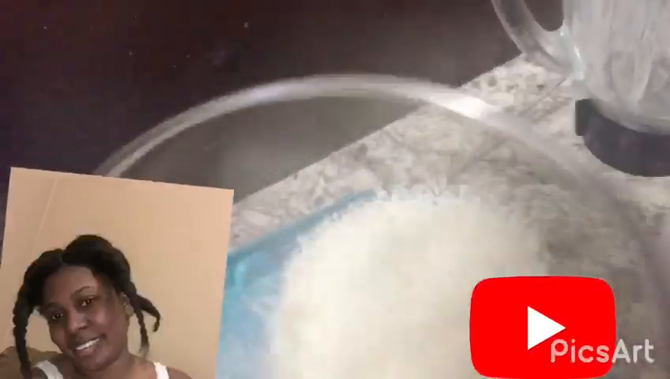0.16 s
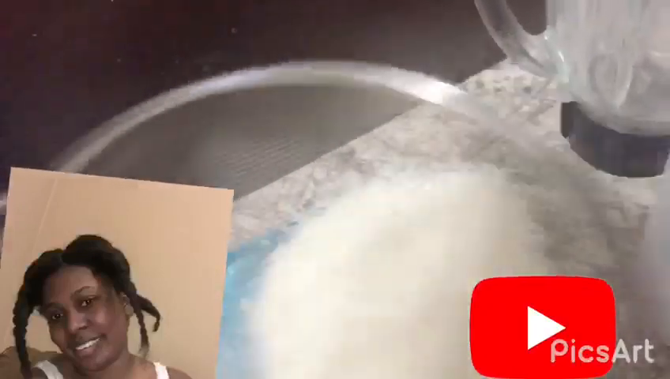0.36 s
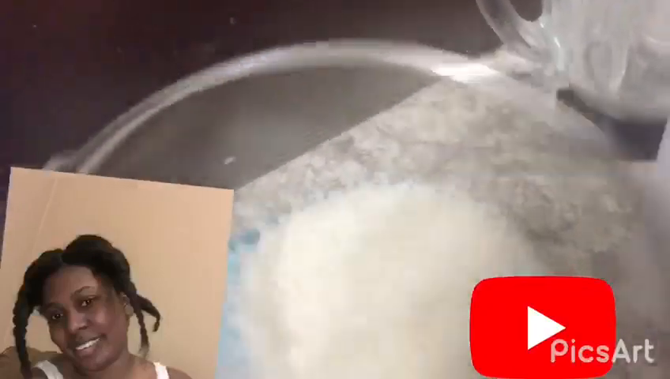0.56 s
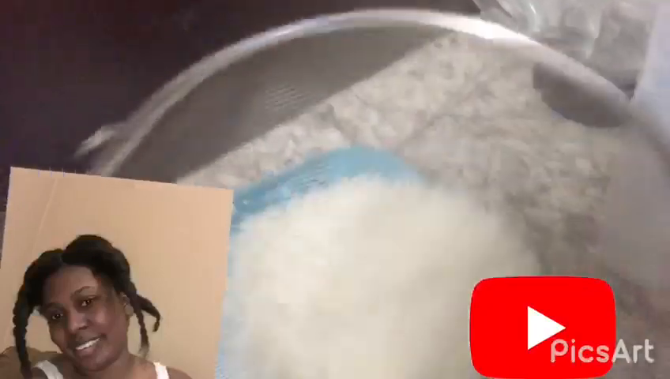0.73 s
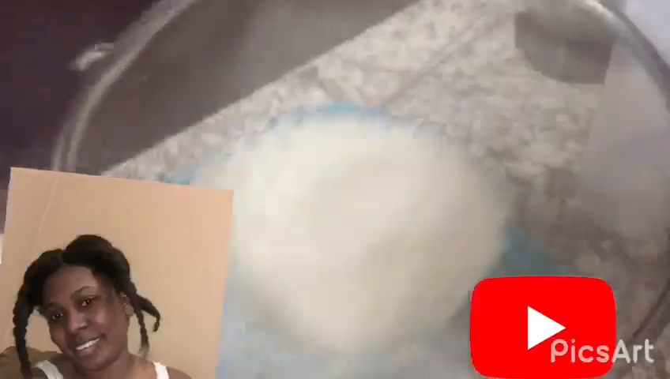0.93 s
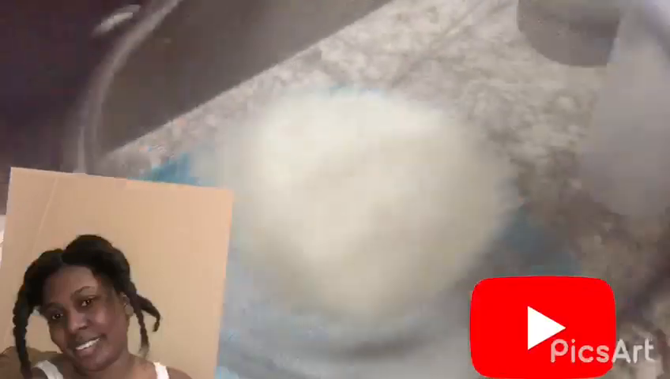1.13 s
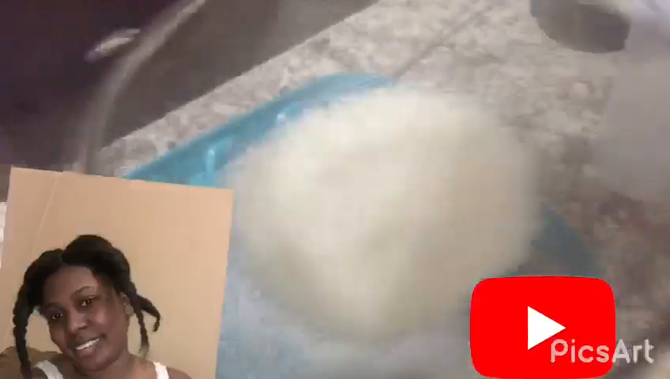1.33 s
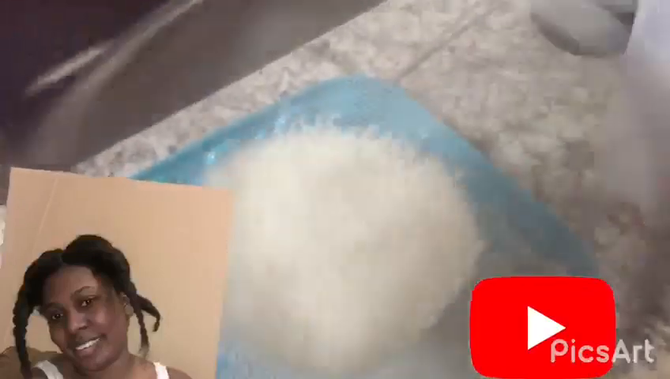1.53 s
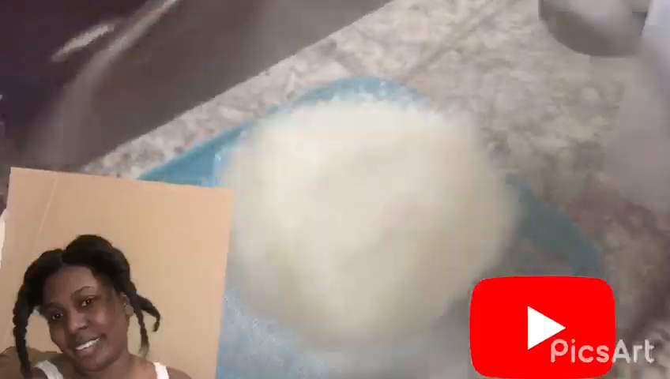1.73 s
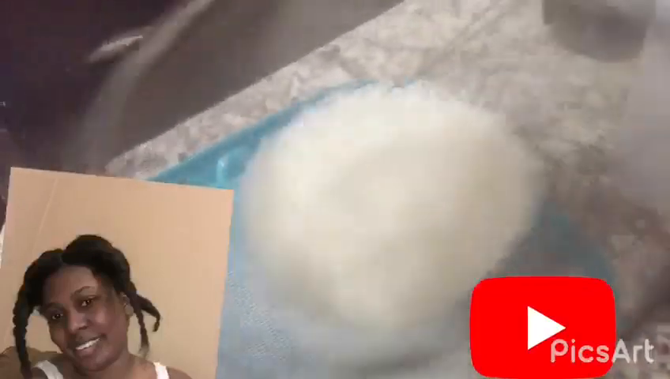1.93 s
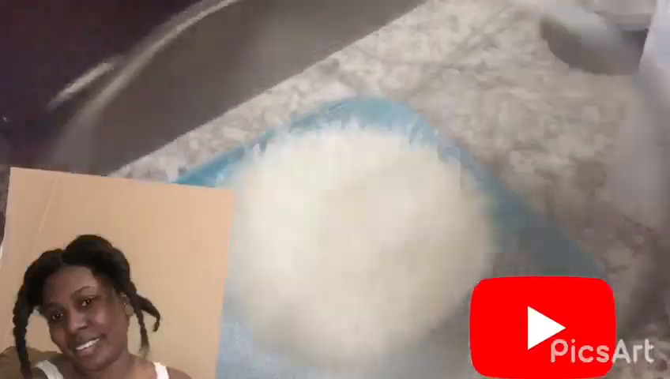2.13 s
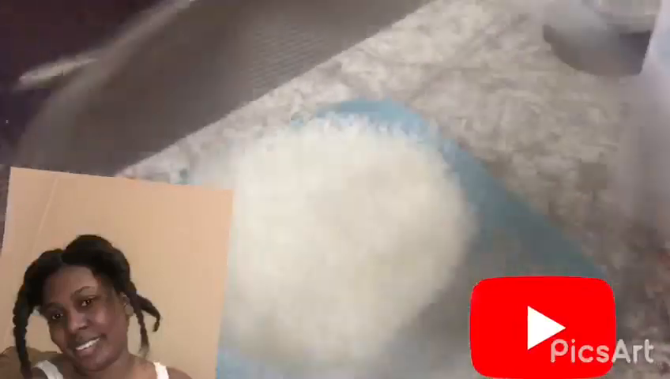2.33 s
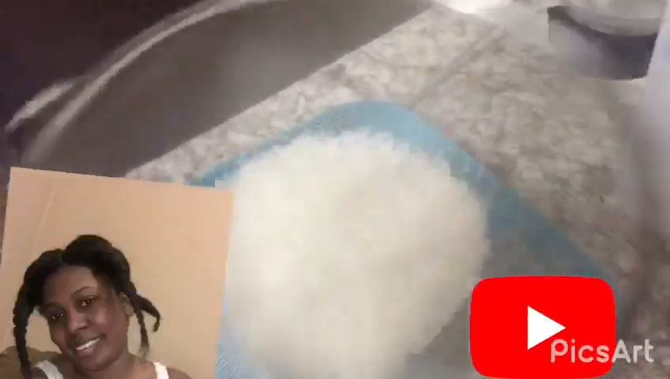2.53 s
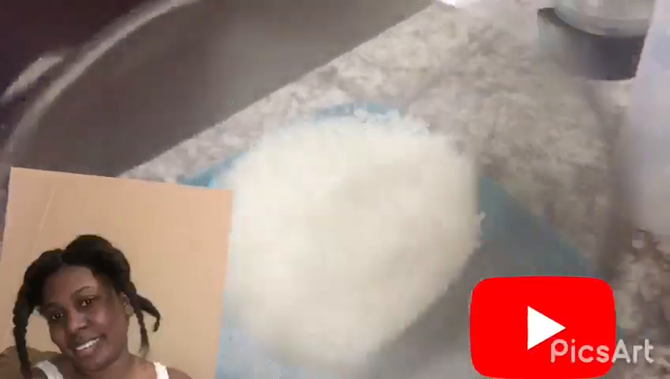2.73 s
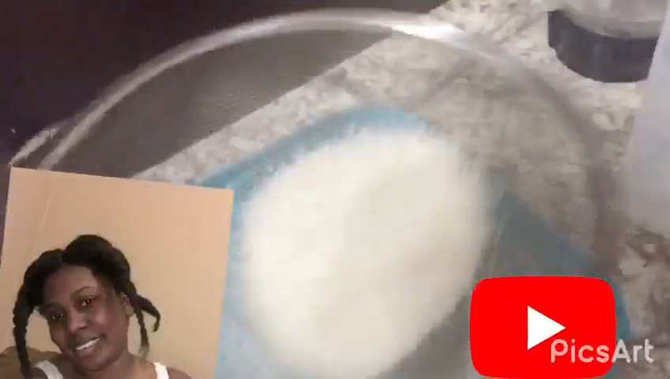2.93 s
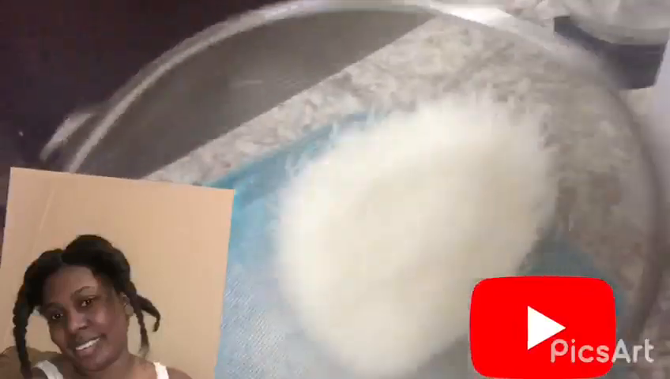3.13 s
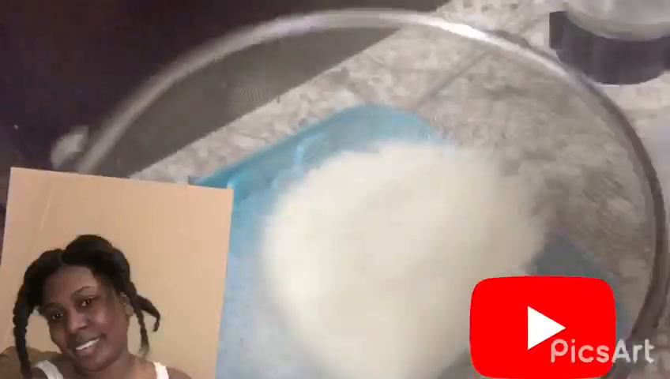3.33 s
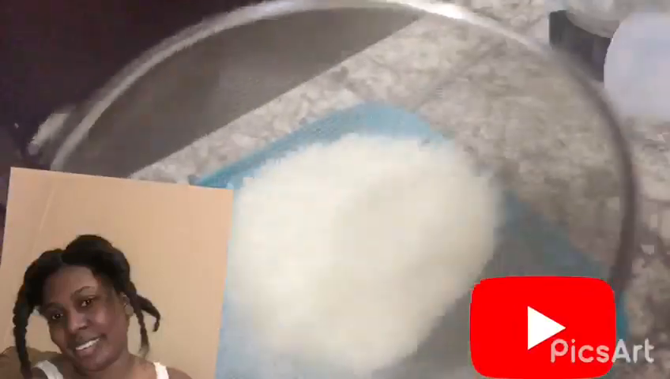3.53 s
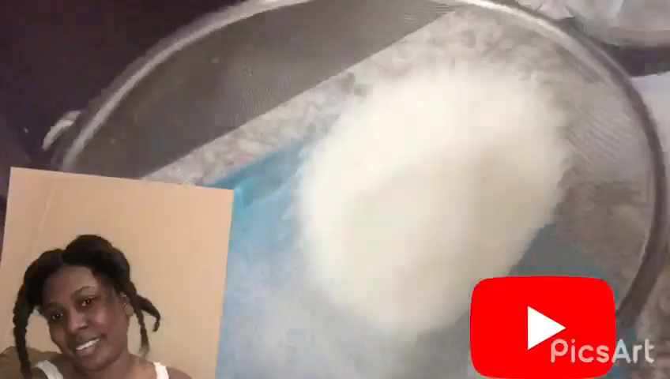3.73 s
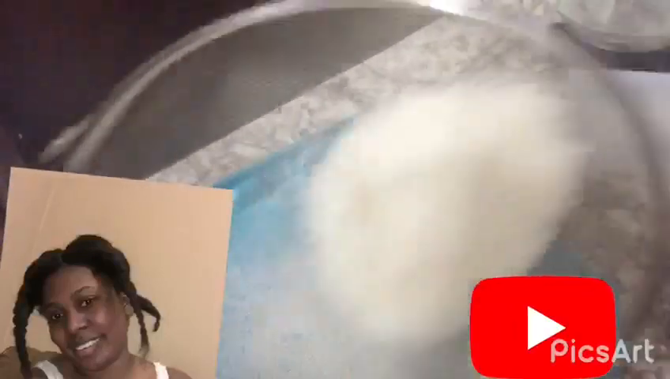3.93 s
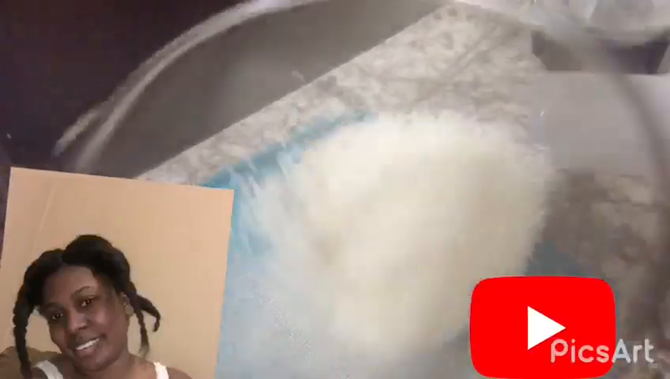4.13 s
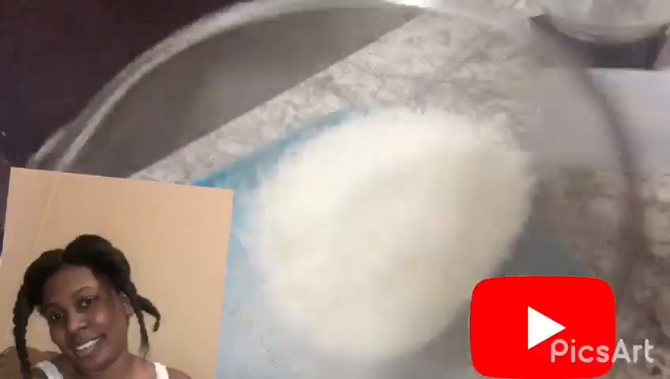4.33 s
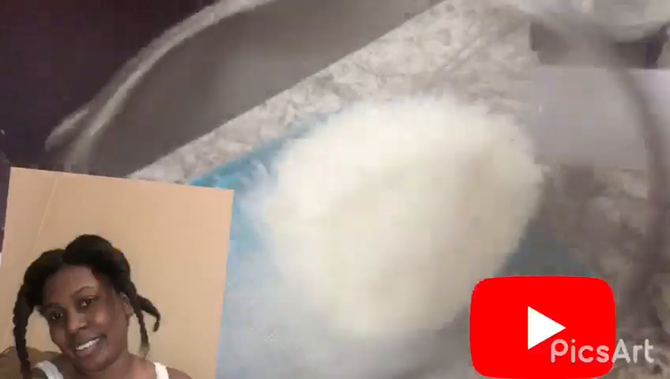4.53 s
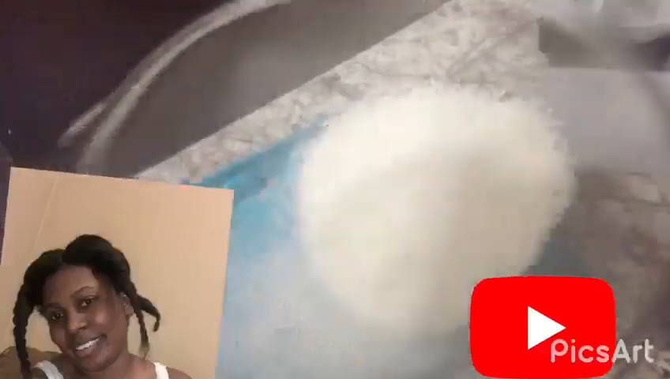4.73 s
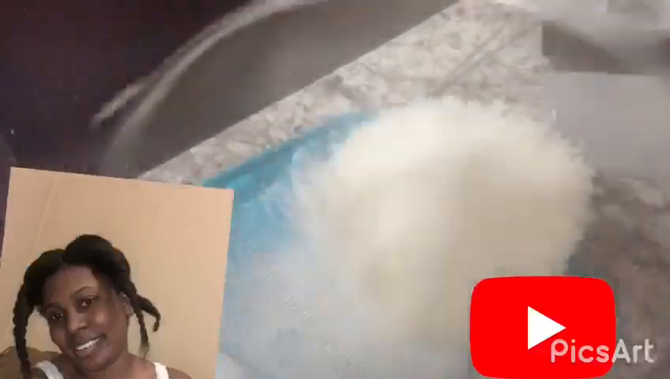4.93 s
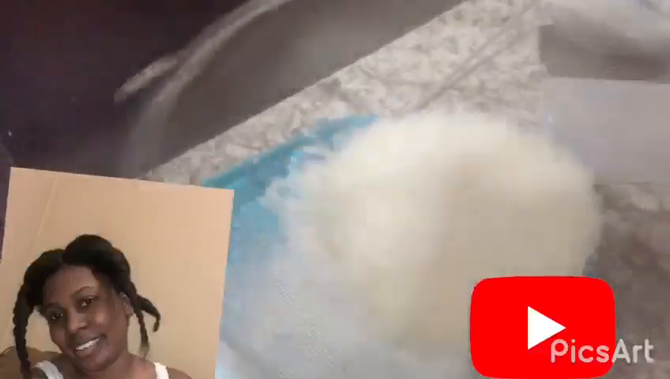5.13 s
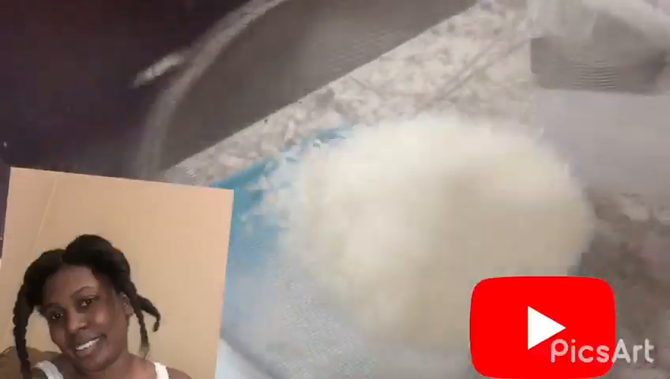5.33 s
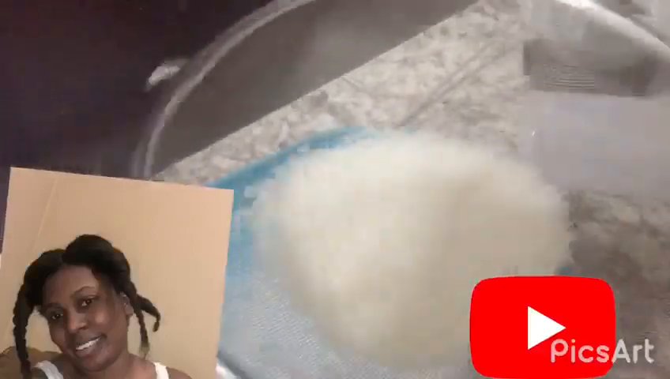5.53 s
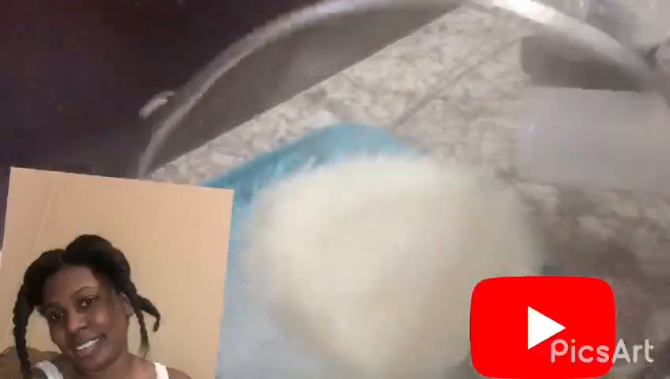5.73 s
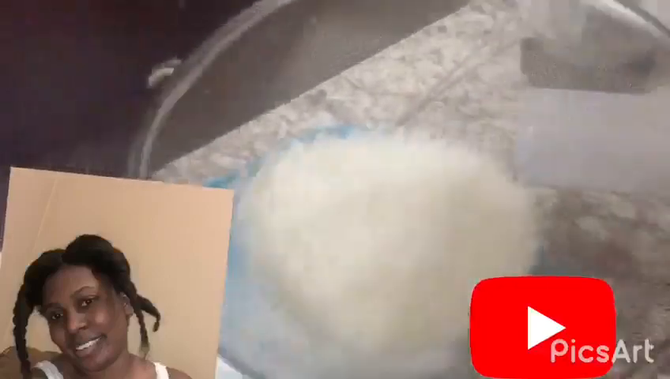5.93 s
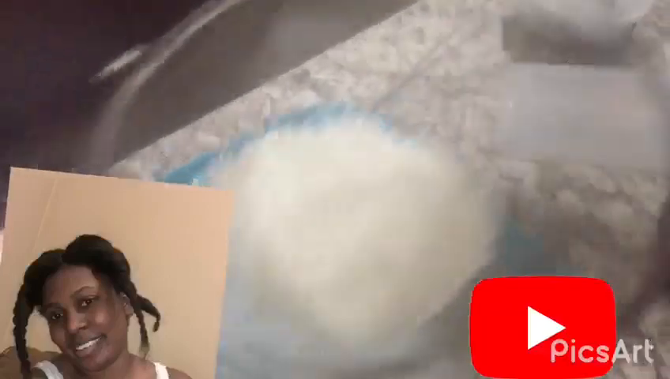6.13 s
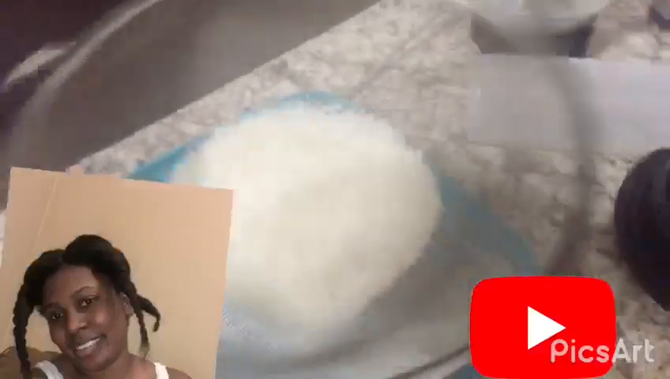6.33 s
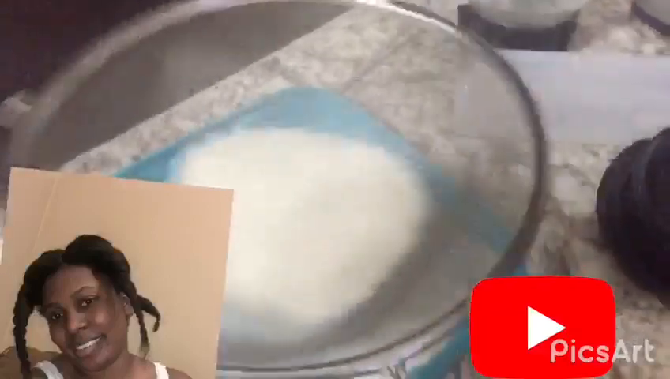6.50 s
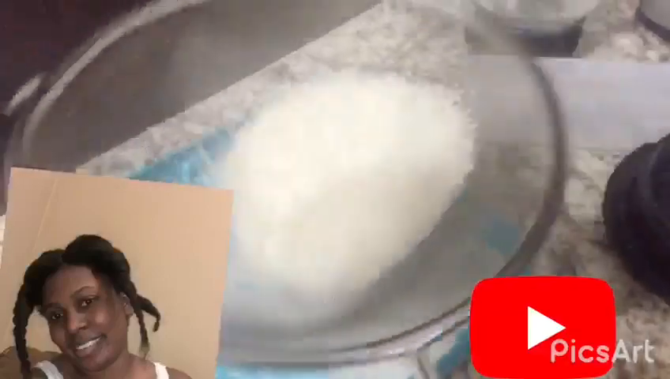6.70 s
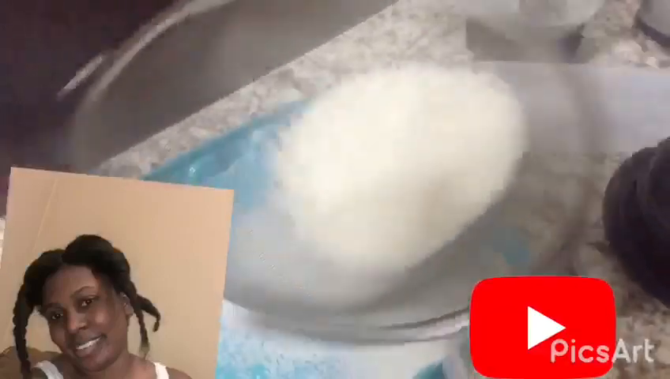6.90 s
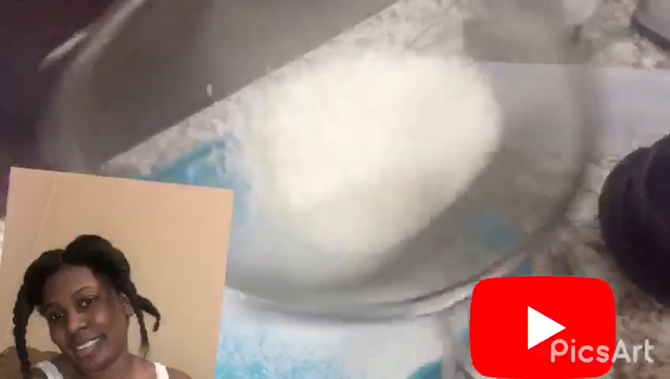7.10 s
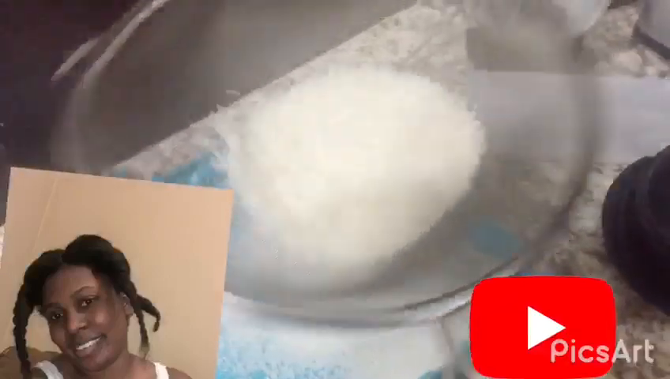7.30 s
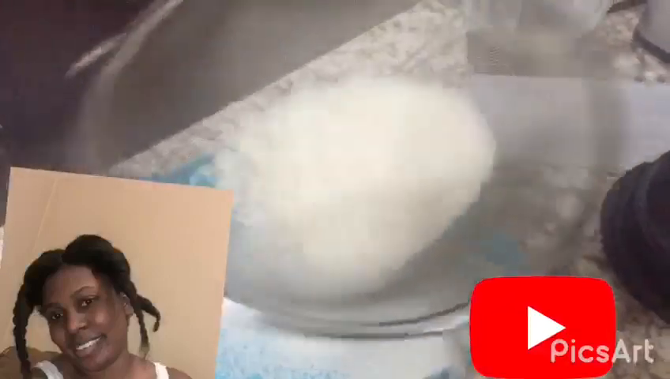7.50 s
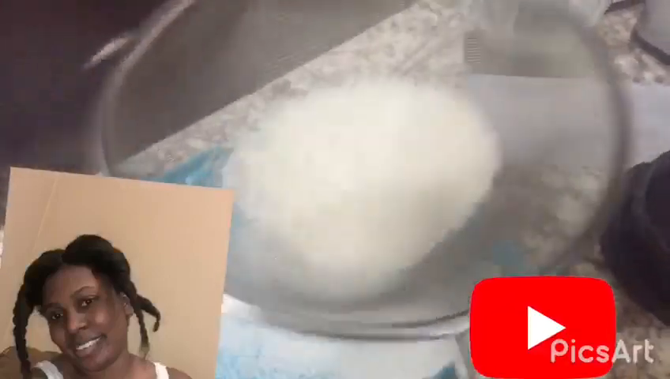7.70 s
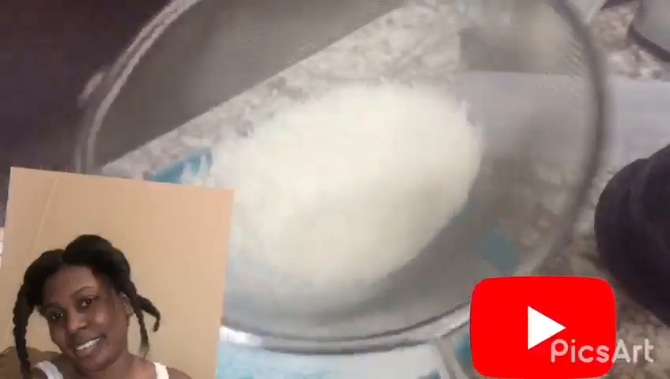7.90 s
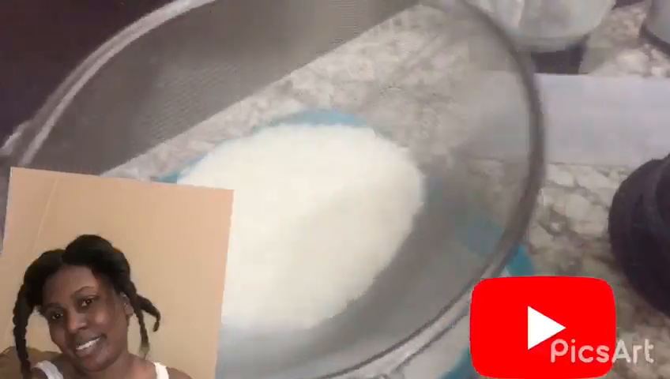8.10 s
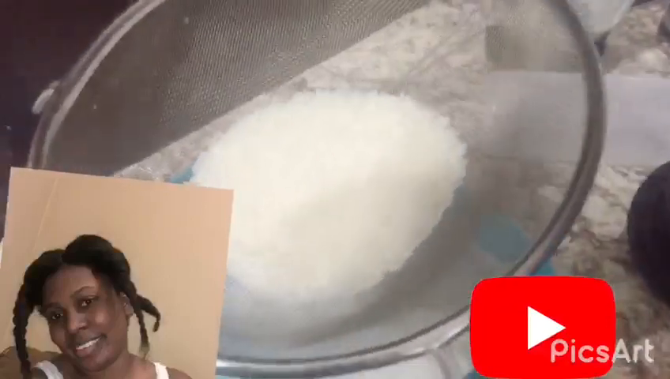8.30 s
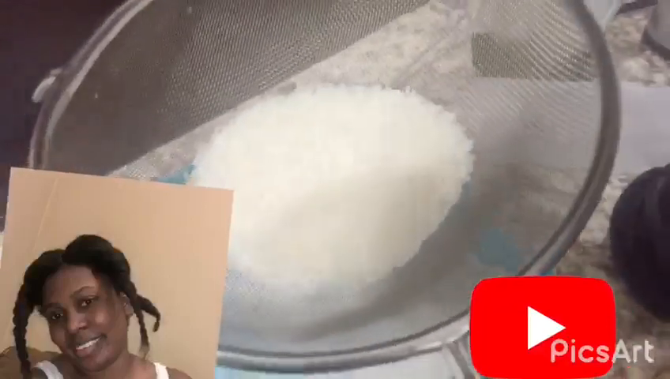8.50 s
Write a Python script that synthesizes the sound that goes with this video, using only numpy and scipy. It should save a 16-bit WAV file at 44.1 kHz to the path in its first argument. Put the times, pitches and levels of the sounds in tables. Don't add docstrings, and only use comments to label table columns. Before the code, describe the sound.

From the start, dry rice flour is shaken briskly in a wire sieve very near the microphone: bright, hissy, gritty rasps alternate pull and push, roughly nine or ten strokes a second, dipping at each turn. Small hard grain snaps, lumps slipping, soft rim taps and dull low hand jolts dot the rhythm. Faint appliance motors hum underneath. Near 3.3 seconds there is a light knock and a longer slide; at 3.5 a short plastic squeak, then at 3.6 a very loud hollow crack, followed by tumbling knocks and rattling until about 4.1. Sieving continues throughout and stays regular until 6.3, where strokes slow and weaken a little, then resume. The last stroke fades around 8.1 with a tiny tap, leaving quiet room air and hum until 8.5. Short, hard kitchen reflections.

```python
import sys
import numpy as np
from scipy import signal
from scipy.fft import rfft, irfft
from scipy.io import wavfile
from scipy.ndimage import map_coordinates

SR = 44100
rng = np.random.default_rng(int(sys.argv[2]) if len(sys.argv) > 2 else 0)


def transcribe(signal):
    frames = np.atleast_2d(signal).T
    limited = np.clip(frames, -1, 1)
    pcm = np.round(limited * 32767).astype(np.int16)
    wavfile.write(sys.argv[1], SR, pcm)


def linear_from_db(decibels):
    return 10 ** (np.asarray(decibels, float) / 20)


N = 377055

# (frequency [Hz], density [dB per Hz])
MESH_SPECTRUM = [(1000, -39), (1900, -25.5), (2550, -20.5), (2900, -11.5), (3450, -4.5), (4100, -10),
                 (4950, -14), (5500, -6.5), (6900, -1.9), (7700, -6), (8700, -1), (10000, -3.5),
                 (10500, -8), (12400, -15.5)]
USUAL_STROKE_DB = -31


def rms_one(x):
    return x / np.sqrt(np.mean(x ** 2) + 1e-30)


def curve(rows):
    s, db = np.transpose(rows)
    return np.interp(np.arange(N) / SR, s, db)


def drift(rate_hz):
    steps = np.arange(0, N + 32, 32)
    place = steps / SR * rate_hz * 2 % 3990
    slow = map_coordinates(rng.standard_normal(4000), [place], order=3)
    return np.interp(np.arange(N), steps, rms_one(slow))


def coloured(x, spectrum):
    hz, db = np.transpose(spectrum)
    grid_hz = np.maximum(np.arange(2049) * SR / 4096, 1)
    cepstrum = irfft(np.log(linear_from_db(np.interp(np.log(grid_hz), np.log(hz), db))))
    cepstrum[1:2048] *= 2
    cepstrum[2049:] = 0
    impulse = irfft(np.exp(rfft(cepstrum)))
    return signal.oaconvolve(x, impulse)[:N]


def cut(x, hz, kind):
    return signal.sosfilt(signal.butter(4, hz, kind, fs=SR, output="sos"), x)


def ring(clicks, hz, t60_s):
    r = np.exp(-np.log(1000) / (max(t60_s, 0.004) * SR))
    w = 2 * np.pi * hz / SR
    return signal.lfilter([0, np.sin(w)], [1, -2 * r * np.cos(w), r * r], clicks + 1e-18)


def resonate(x, peaks):
    return rms_one(sum(linear_from_db(db) * rms_one(ring(x, hz, 2.2 / width_hz)) for hz, width_hz, db in peaks))


def grains(per_s, spread_db):
    sizes = linear_from_db(spread_db * np.minimum(rng.exponential(1, N), 3.6)) * rng.choice([-1, 1], N)
    return sizes * (rng.random(N) < per_s / SR)


def clicks_at(events, gain_db):
    clicks = np.zeros(N)
    clicks[[round(s * SR) for s, db in events]] = linear_from_db(np.array(events)[:, 1] + gain_db)
    return clicks


def patchy(x, patch_db, patch_hz, patch_s, size):
    hz, s, z = signal.stft(x, SR, nperseg=size)
    where = np.meshgrid(hz / patch_hz % 299, s / patch_s % 299, indexing="ij")
    field = map_coordinates(rng.standard_normal((300, 300)), where, order=1)
    return signal.istft(z * linear_from_db(patch_db * field), SR, nperseg=size)[1][:N]


def soft_notes(rows, t60_s, attack_s, rough):
    out = np.zeros(N)
    t = np.arange(4096) / SR
    for (s, db, hz), draw in zip(rows, rng.standard_normal((len(rows), 4096))):
        shape = (1 - np.exp(-t / attack_s)) * linear_from_db(-60 * t / t60_s)
        wobble = 1 + rough * rms_one(cut(draw, hz * 0.16, "low"))
        at = round(s * SR)
        out[at:at + 4096] += linear_from_db(db + 8.5) * shape * wobble * np.sin(2 * np.pi * hz * t)
    return out


def room(x, t60_s, wall_hz):
    t = np.arange(SR // 2) / SR
    tail = cut(rng.standard_normal(len(t)), wall_hz, "low") * linear_from_db(-60 * t / t60_s) * (t > 0.006)
    return signal.oaconvolve(x, tail / np.sqrt(np.sum(tail ** 2)))[:N]


def air():
    # (frequency [Hz], density [dB per Hz])
    air_spectrum = [(300, -30), (500, -5.5), (700, -11.5), (1200, -13.5), (1900, -18.5), (3000, -21.5),
                    (5000, -23.5), (7000, -27.5), (9000, -31), (12000, -33)]
    return linear_from_db(-64.5) * rms_one(coloured(rng.standard_normal(N), air_spectrum))


def motors():
    # (frequency [Hz], level [dB rms])
    mains_lines = [(59.2, -67.5), (118.8, -70), (473.7, -64)]
    # (frequency [Hz], relative level [dB])
    second_lines = [(195.3, -3), (293, -10.5), (390.6, -2)]
    # (time [s], level [dB])
    load = [(0.0, -64), (0.52, -55), (0.9, -60.5), (2.9, -61.5), (4.19, -60.5), (5.88, -61), (6.45, -64.5),
            (7.48, -63.5), (7.81, -76), (8.55, -66)]
    # (frequency [Hz], width [Hz], level [dB rms])
    whine_bands = [(3500, 160, -78), (6250, 320, -76), (4550, 150, -86)]
    t = np.arange(N) / SR
    mains = sum(linear_from_db(db + 1.0 + 0.8 * drift(2.2)) * np.sin(2 * np.pi * hz * t) for hz, db in mains_lines)
    waver_s = np.cumsum(1 + 0.0026 * drift(1.5)) / SR
    second = sum(linear_from_db(db + 2.5 + 1.7 * drift(3.5)) * np.sin(2 * np.pi * hz * waver_s)
                 for hz, db in second_lines)
    whine = sum(linear_from_db(db) * resonate(rng.standard_normal(N), [(hz, width_hz, 0)])
                for hz, width_hz, db in whine_bands)
    return mains + linear_from_db(curve(load)) * second + whine


def counter_bumps():
    # (frequency [Hz], density [dB per Hz])
    bump_spectrum = [(18, -38), (30, -24.5), (54, -1.5), (188, -1.5), (357, -0.5), (389, -1), (417, -2.5),
                     (481, -8), (900, -23), (1170, -61.5), (1980, -120)]
    # (time [s], level [dB])
    hand_level = [(0.0, -51.5), (0.52, -53), (0.9, -56), (1.29, -53), (1.76, -54.5), (2.9, -55.5),
                  (3.62, -50.5), (3.86, -47), (4.0, -56.5), (5.52, -59.5), (5.88, -54), (7.48, -56),
                  (7.81, -53.5), (8.55, -58.5)]
    bumps = rms_one(coloured(rng.standard_normal(N) * linear_from_db(1.4 * drift(9)), bump_spectrum))
    bumps = patchy(bumps, patch_db=5.0, patch_hz=63.4, patch_s=0.05, size=2048)
    return bumps * linear_from_db(curve(hand_level) - 1.5)


def hand_contacts():
    # (time [s], peak [dB], frequency [Hz])
    rim_taps = [(0.091, -53, 580), (0.606, -53, 564), (1.163, -55, 584), (2.009, -54, 567),
                (2.269, -49, 493), (4.298, -56, 586), (4.714, -53, 724), (6.261, -55, 616),
                (6.338, -51, 501), (7.933, -48, 560), (8.088, -56, 568)]
    # (time [s], peak [dB], frequency [Hz])
    jolts = [(0.111, -30, 157), (0.221, -37, 161), (0.539, -34, 180), (0.629, -38, 191), (0.949, -55, 91.5),
             (1.249, -46, 192), (2.079, -44, 127), (2.838, -46, 206), (4.385, -39, 209), (5.849, -47, 116),
             (6.039, -43, 353), (6.229, -44, 245), (6.748, -43, 174), (6.999, -46, 91.5), (7.199, -43, 102),
             (7.67, -47, 124), (7.979, -44, 92), (8.383, -43, 108)]
    tapping = soft_notes(rim_taps, t60_s=0.046, attack_s=0.0015, rough=0.99)
    return tapping + soft_notes(jolts, t60_s=0.05, attack_s=0.0092, rough=0.4)


def squeak():
    # (time [s], peak [dB], frequency [Hz])
    slip_notes = [
        (3.494, -41.5, 1980),
        (3.522, -42, 2070),
        (3.539, -36.5, 2100),
        (3.552, -38, 2050),
        (3.567, -34, 2150),
        (3.581, -33.5, 2050),
        (3.538, -44, 1180),
        (3.553, -48, 1160),
    ]
    return soft_notes(slip_notes, t60_s=0.035, attack_s=0.005, rough=0.55)


def rattle():
    # (time [s], hollow [dB], scrape [dB], dying time [ms])
    wobbles = [(3.271, -36.5, -49, 280), (3.495, -47.5, -56, 280), (3.53, -63.5, -57.5, 560),
               (3.604, -29.5, -34, 320), (3.648, -40.5, -40.5, 200), (3.673, -35, -40.5, 340),
               (3.731, -32, -31, 270), (3.824, -31.5, -35, 300), (3.85, -33.5, -33, 370),
               (3.889, -43, -38, 180), (3.915, -40, -40, 200), (3.953, -40.5, -44.5, 470),
               (4.138, -44, -48, 120)]
    # (frequency [Hz], width [Hz], level [dB])
    hollow_modes = [(176, 50, 3), (342, 40.4, 4), (507, 39, 0.5), (665, 109.5, -8.5)]
    # (frequency [Hz], width [Hz], level [dB])
    scrape_modes = [(1000, 600, 2.5), (2050, 620, -0.5), (1460, 600, -2.5), (3200, 1200, -5.5)]
    hollow = resonate(grains(per_s=600, spread_db=1.5), hollow_modes)
    scrape = cut(resonate(grains(per_s=2500, spread_db=3), scrape_modes), 700, "high")
    out = np.zeros(N)
    t = np.arange(SR) / SR
    for s, hollow_db, scrape_db, dying_ms in wobbles:
        at = round(s * SR)
        now = slice(at, at + SR)
        fade = np.minimum(t / 0.004, 1) * linear_from_db(-60000 * t / dying_ms)
        out[now] += fade * (linear_from_db(hollow_db) * hollow[now] + linear_from_db(scrape_db) * scrape[now] * fade ** 0.25)
    return out


def knocks():
    # (time [s], peak [dB], body [Hz], crack relative [dB], thump relative [dB])
    blows = [(3.2699, -24.5, 412, 0, -23), (3.283, -33, 330, -15, -2), (3.5994, -3.5, 672, -4.5, -37.5),
             (3.6007, -37.5, 1920, 13.5, -30), (3.6073, -19.5, 920, -12, -33),
             (3.646, -12.5, 1100, -9, -23), (3.6693, -15, 516, -8.5, -24.5), (3.675, -16.5, 347, -31, -10),
             (3.7306, -15, 540, -3.5, -27), (3.741, -27, 480, -4, -20), (3.746, -29, 350, -15, -21),
             (3.824, -29, 333, -0.5, -6), (3.848, -10.5, 1117, 0, -34.5), (3.853, -20.5, 1390, 6, -9),
             (3.856, -15.5, 420, -12, -16), (3.889, -30, 2230, 2, -19), (3.9132, -27, 430, -1, -20),
             (3.9167, -16.5, 412, -20, -28), (3.9523, -25, 426, -11, -12), (4.139, -37.5, 390, -7, -11),
             (8.087, -47, 704, -5, -30)]
    # (frequency [Hz], density [dB per Hz])
    shell_spectrum = [(900, 4.5), (1500, -0.5), (2000, 4.5), (2500, 2.5), (3300, 4), (4300, -3),
                      (5000, -9.5), (5600, -5.5), (9000, -24.5), (20000, -62)]
    bodies, cracks = np.zeros(N), np.zeros(N)
    t = np.arange(8192) / SR
    for (s, db, hz, crack_db, thump_db), draw in zip(blows, rng.standard_normal((len(blows), 8192))):
        contact_ms = 2.07 * (600 / hz) ** 0.55
        touch = t * 1000 / contact_ms
        contact = 1.3 * np.tanh(draw / 1.76) * np.minimum(touch * 2.5, 1) * np.exp(-touch * 0.67)
        note = np.sin(2 * np.pi * hz * t) * touch * np.exp(-touch)
        rough = ring(contact, hz * 0.9, 16 / hz) + ring(contact, hz * 1.5, 16 / hz)
        body = note / np.abs(note).max() + linear_from_db(-11.0) * rough / np.abs(rough).max()
        thump = np.sin(2 * np.pi * 178 * t) * t / 0.012 * np.exp(1 - t / 0.0093)
        at = round(s * SR)
        bodies[at:at + 8192] += linear_from_db(db - 2.5) * (body + linear_from_db(thump_db - 7.0) * thump)
        cracks[at:at + 8192] += linear_from_db(db + crack_db + 10.5) * contact
    return bodies + coloured(cracks, shell_spectrum)


def snaps():
    # (time [s], peak [dB])
    hard_grains = [(1.1425, -22), (2.1835, -22), (2.3082, -15), (3.1549, -22), (3.3506, -25), (3.9992, -23),
                   (4.9024, -22), (5.6891, -28), (6.4441, -25), (8.093, -30)]
    return coloured(clicks_at(hard_grains, gain_db=7), MESH_SPECTRUM)


def strokes():
    # (pull time [s], pull level [dB], push time [s], push
    # level [dB])
    shakes = [(0.0, -29.0, 0.111, -33.5), (0.208, -29.0, 0.309, -29.5), (0.4, -31.0, 0.522, -30.5),
              (0.62, -31.5, 0.732, -31.5), (0.819, -31.5, 0.945, -32.5), (1.033, -28.0, 1.148, -29.5),
              (1.253, -29.5, 1.362, -31.0), (1.457, -30.0, 1.581, -26.5), (1.672, -31.0, 1.776, -32.5),
              (1.872, -34.5, 1.98, -32.0), (2.068, -28.5, 2.185, -28.5), (2.28, -29.5, 2.391, -29.5),
              (2.49, -29.0, 2.608, -30.0), (2.701, -28.0, 2.821, -32.0), (2.909, -30.0, 3.027, -27.0),
              (3.13, -26.5, 3.234, -29.0), (3.32, -32.0, 3.44, -32.5), (3.536, -34.0, 3.64, -34.0),
              (3.741, -27.5, 3.852, -30.5), (3.958, -31.0, 4.079, -26.5), (4.173, -30.0, 4.277, -30.5),
            (4.367, -29.0, 4.483, -30.5), (4.575, -29.0, 4.684, -32.0), (4.773, -29.0, 4.886, -28.0),
            (4.987, -28.5, 5.104, -28.5), (5.206, -29.5, 5.328, -29.0), (5.428, -31.5, 5.54, -31.0),
            (5.641, -32.5, 5.75, -29.0), (5.849, -32.0, 5.948, -30.5), (6.048, -31.0, 6.162, -30.0),
            (6.271, -31.5, 6.416, -33.5), (6.509, -35.0, 6.645, -35.5), (6.728, -29.5, 6.862, -36.5),
            (6.948, -30.5, 7.076, -30.5), (7.163, -30.5, 7.285, -33.5), (7.37, -32.0, 7.49, -31.0),
            (7.585, -29.5, 7.698, -32.5), (7.795, -31.5, 7.914, -30.5), (7.996, -39.0, 8.097, -48.5)]
    s, db = np.reshape(shakes, (-1, 2)).T
    return s, db - USUAL_STROKE_DB, np.arange(len(s)) % 2 == 0


def turns():
    # (time [s], level over the usual turn [dB])
    odd_turns = [
        (0.674, -3),
        (1.729, 4),
        (3.29, 12),
        (4.012, 5),
        (5.05, -3.5),
        (6.107, -1.5),
        (6.221, -4),
        (6.575, -5.5),
        (6.802, 2.5),
    ]
    s, strength_db, pull = strokes()
    gap_s, pull = np.diff(s), pull[1:]
    at_s = s[:-1] + gap_s * np.where(pull, 0.53, 0.46)
    db = np.where(pull, -47, -45) + 0.58 * strength_db[:-1]
    db -= 55 * (gap_s - 0.105)
    for odd_s, odd_db in odd_turns:
        db[np.argmin(np.abs(at_s - odd_s))] += odd_db
    return np.r_[at_s, 8.22], np.r_[db, -85]


def swing_level(roundness, linger):
    full_s, strength_db, _ = strokes()
    turn_s, turn_db = turns()
    s = np.c_[full_s, turn_s].ravel()
    db = np.c_[strength_db + USUAL_STROKE_DB, turn_db].ravel()
    place = np.interp(np.arange(N) / SR, s, np.arange(len(s)))
    top = np.minimum(2 * np.round(place / 2), len(s) - 2)
    away = np.abs(place - top)
    fallen = (1 - linger) * away ** roundness + linger * np.sin(away * np.pi / 2) ** 2
    return np.interp(top + np.sign(place - top) * fallen, np.arange(len(s)), db)


def stroke_colour(pull_db, push_db, follows, chance_db):
    s, strength_db, pull = strokes()
    db = np.where(pull, pull_db, push_db) + follows * np.maximum(strength_db, -5)
    db = db + chance_db * rng.standard_normal(len(s))
    return np.interp(np.arange(N) / SR, s, db)


def sieve():
    # (time [s], peak [dB])
    slips = [(1.2281, -20), (1.4381, -29), (1.5854, -25), (2.8868, -19), (3.1074, -24), (3.335, -28),
             (5.8212, -21), (6.1357, -34), (6.9196, -16), (7.142, -24), (7.7745, -23)]
    # (time [s], level [dB])
    rim_sway = [(0, 1), (0.9, -1), (1.3, 1), (2.3, 1), (2.9, 0), (4.4, 0), (5.2, 0), (6.0, -1.5), (7.4, 0),
                (8.55, 0.5)]
    rim_top_hz, top_from_hz = 4980, 7900
    level = linear_from_db(swing_level(roundness=1.91, linger=0.19) + 0.69 * drift(35) + 0.51 * drift(120))
    lumps = clicks_at(slips, gain_db=-15.5)
    level += signal.lfilter([1], [1, -np.exp(-1 / (0.0064 * SR))], lumps + 1e-18)
    rim_db = stroke_colour(pull_db=-11.5, push_db=-15.5, follows=-0.2, chance_db=1.3) + curve(rim_sway)
    top_db = stroke_colour(pull_db=-0.2, push_db=-3, follows=-0.52, chance_db=0.1)
    rasp = coloured(grains(per_s=14000, spread_db=1.5), MESH_SPECTRUM)
    rasp = patchy(rasp, patch_db=2.0, patch_hz=589.6, patch_s=0.05, size=512)
    rasp = patchy(rasp, patch_db=3.0, patch_hz=60.1, patch_s=0.09, size=2048)
    rim = rms_one(cut(rasp, rim_top_hz, "low")) * linear_from_db(rim_db + 2.5 + 1.1 * drift(25))
    mesh = rms_one(cut(cut(rasp, rim_top_hz, "high"), top_from_hz, "low")) * linear_from_db(-3.5)
    top = rms_one(cut(rasp, top_from_hz, "high")) * linear_from_db(0.47 * top_db - 3.0)
    return level * (rim - mesh + top)


def scene():
    background = air() + motors() + counter_bumps() + hand_contacts()
    blows = knocks() + linear_from_db(-0.5) * squeak()
    clatter = blows + linear_from_db(-22) * room(blows, t60_s=0.15, wall_hz=5500) + rattle()
    shake = sieve() + snaps()
    shake = shake + linear_from_db(-20.5) * room(shake, t60_s=0.13, wall_hz=11000)
    mono = shake + cut(clatter, 103, "high") + background
    return np.array([mono, mono])


def band_limit(x):
    return signal.sosfilt(signal.butter(12, 12930, fs=SR, output="sos"), x)


def record(dry):
    # (treble level [dB], highest frequency kept [Hz])
    treble_edge = [(-60, 11600), (-46, 11850), (-36, 12050), (-30, 12250), (-24, 12750)]
    overload, band_hz = 1.8, 172
    hz, _, z = signal.stft(overload * np.tanh(dry / overload), SR, nperseg=1024)
    treble_db = 10 * np.log10(np.sum(np.abs(z[0, hz > 5000]) ** 2, axis=0) + 1e-12)
    treble_db = treble_db + 1.5 * rng.standard_normal(z.shape[2])
    edge_hz = band_hz * np.round(np.interp(treble_db, *np.transpose(treble_edge)) / band_hz)
    mix = signal.istft(z * (hz[:, None] < edge_hz), SR, nperseg=1024)[1][:, :N]
    return band_limit(mix)


dry = scene()
out = record(dry)
transcribe(out)
```